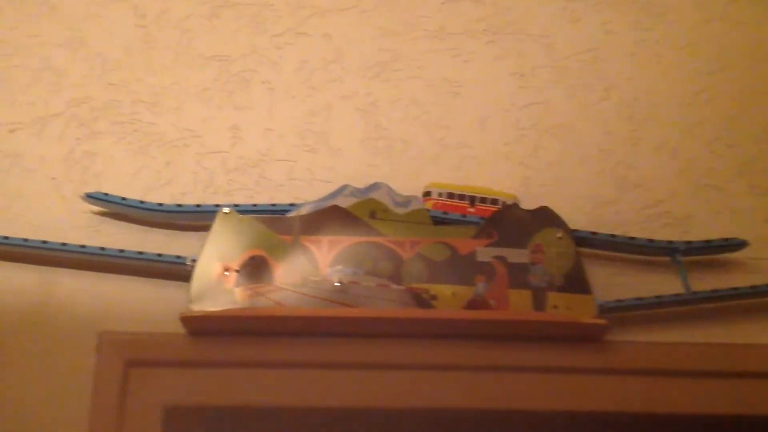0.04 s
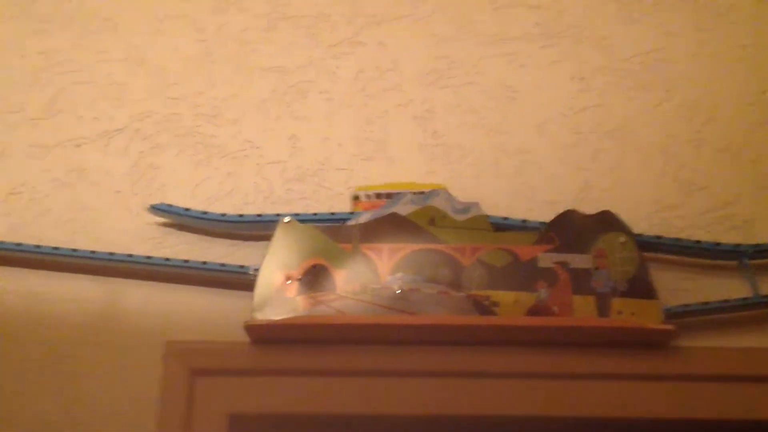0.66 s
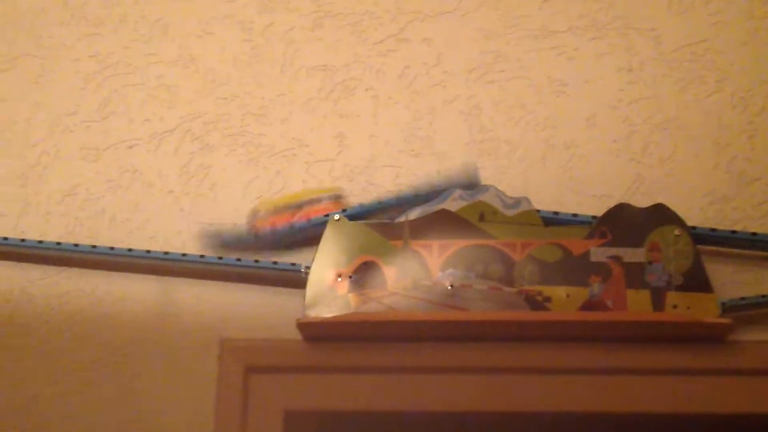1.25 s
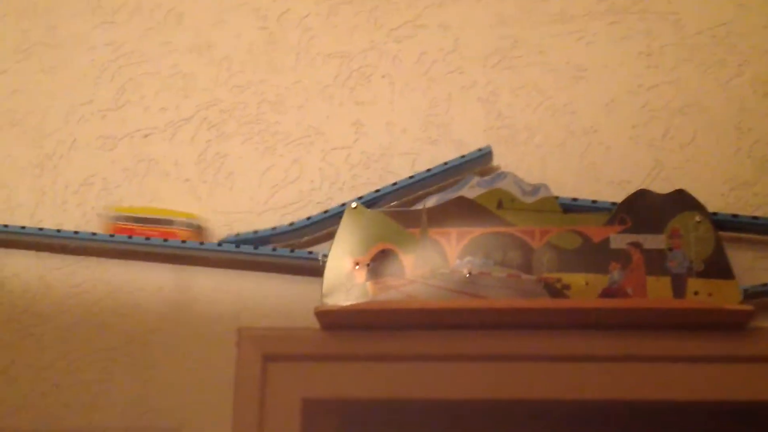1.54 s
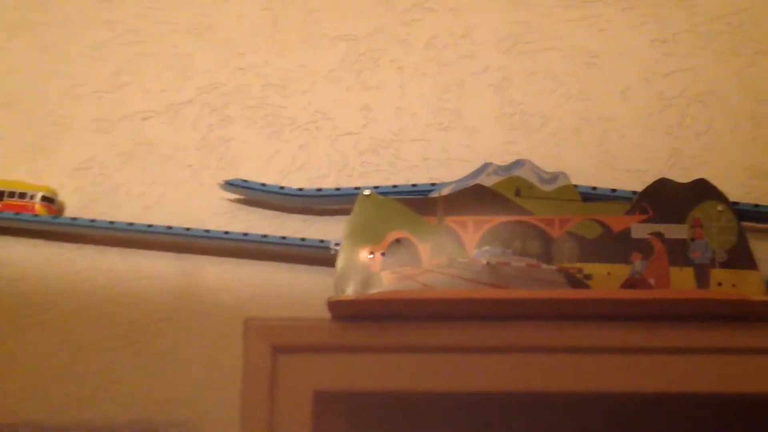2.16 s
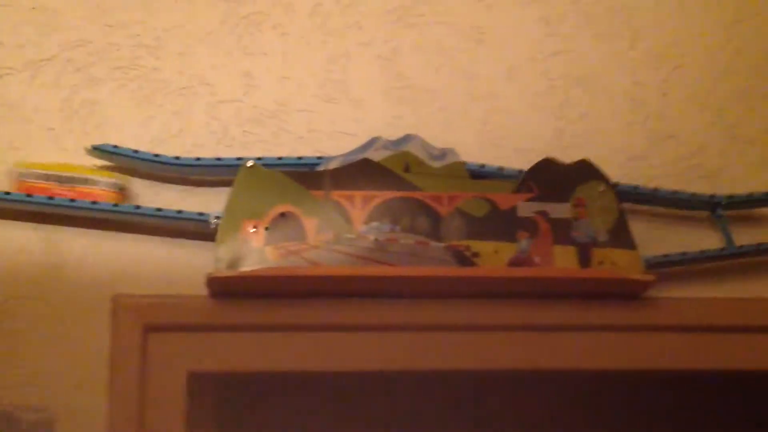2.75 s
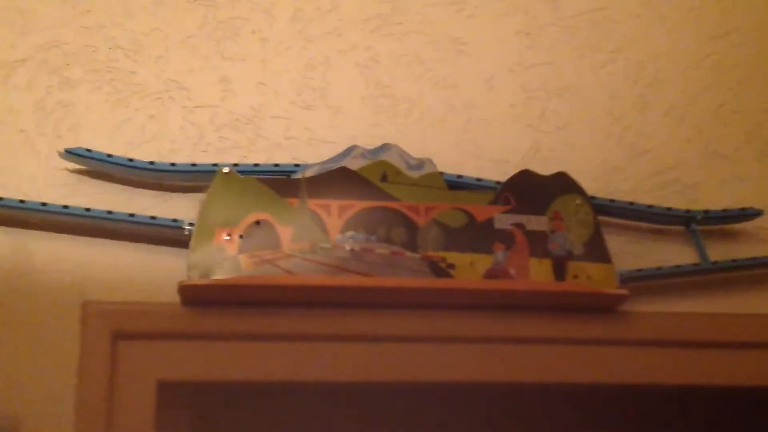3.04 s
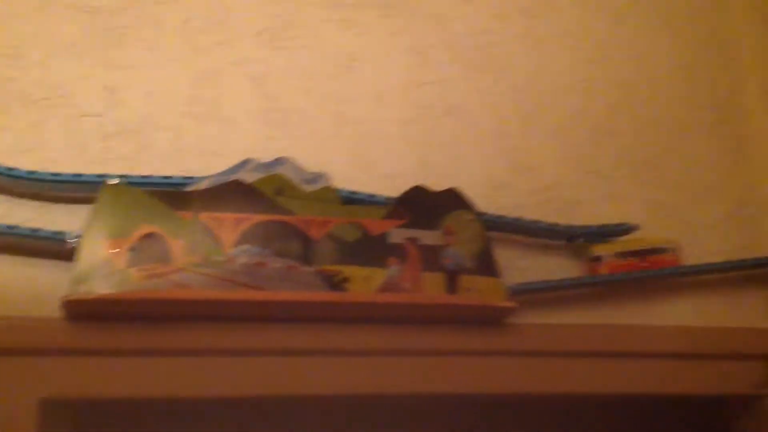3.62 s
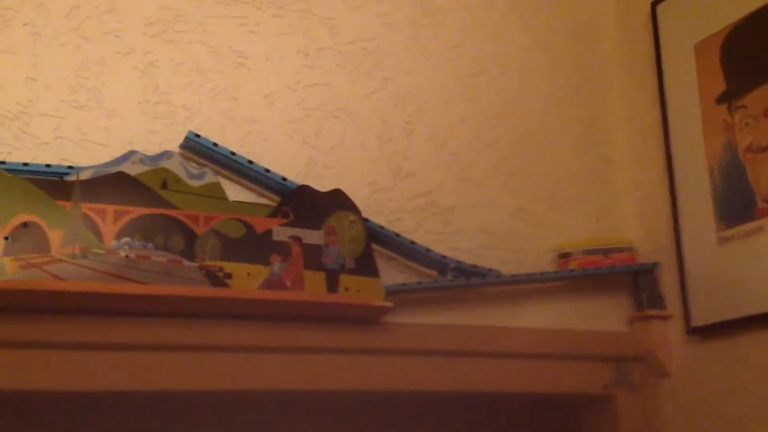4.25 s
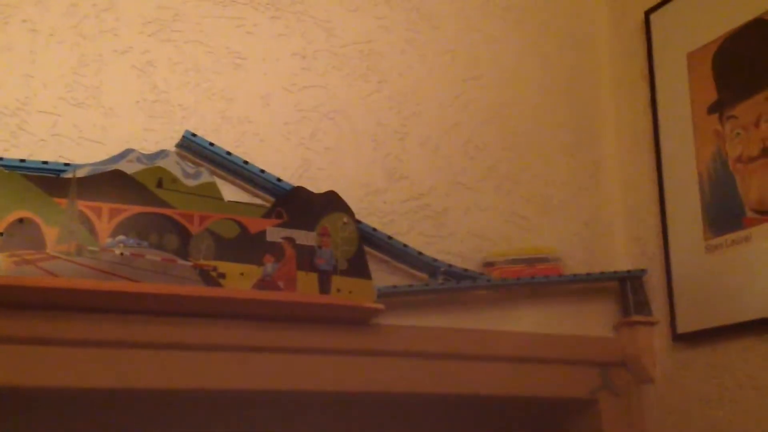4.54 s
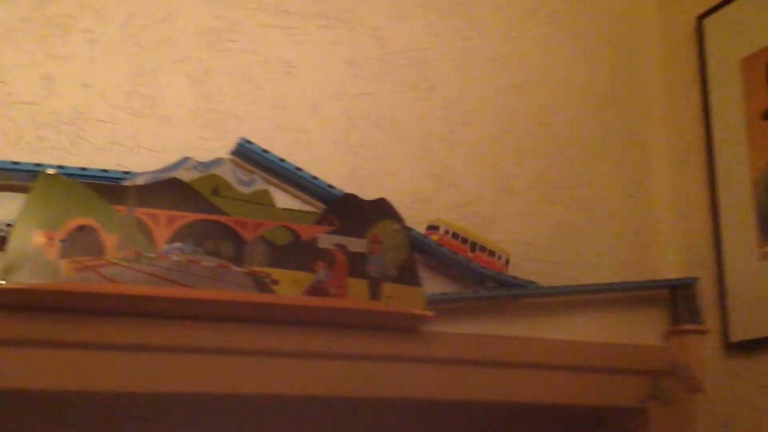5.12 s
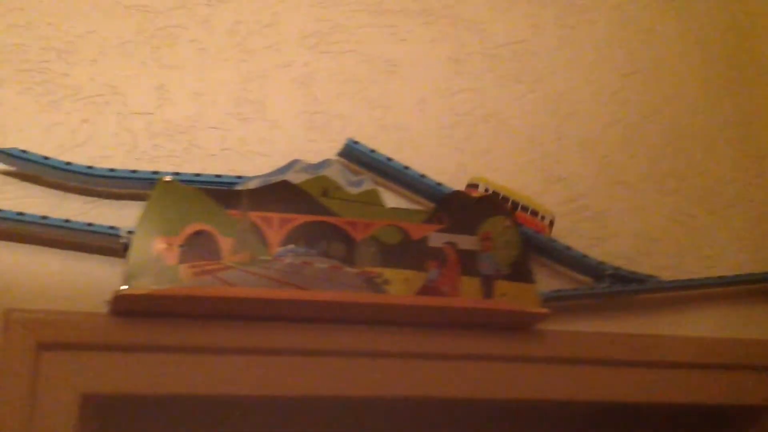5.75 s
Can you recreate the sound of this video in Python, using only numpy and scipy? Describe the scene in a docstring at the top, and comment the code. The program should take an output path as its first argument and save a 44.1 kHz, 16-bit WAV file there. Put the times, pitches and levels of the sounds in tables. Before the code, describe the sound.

In a small room, the thin, buzzing chatter of a wind-up toy bus mixes with wheels rattling on a tin track. A burst of metallic clatter and a knock stop it, with a brief ring from the rail. It rolls off again, growing louder as the gears return, then knocks to a second halt. More clatter follows, and the gears whir on, gradually slowing, dotted with hard tinny clicks. A faint hush lies underneath.

```python
"""First you hear the chattering gears and rumbling wheels of a clockwork tin bus in a small room. It shuttles
along a sheet-metal track, and its wheels shake the tin scenery into a drone. It clatters over two tipping ramps
and bumps the end stops, where it halts and rolls back. A few blows leave the rail ringing. The wheels bump over
rail joints and the pinion now and then skips a tooth with a click. A faint hush lies under it all."""
import sys
import numpy as np
from scipy import signal
from scipy.fft import rfft, irfft, next_fast_len
from scipy.io import wavfile
from scipy.ndimage import map_coordinates

SR = 44100
rng = np.random.default_rng(int(sys.argv[2]) if len(sys.argv) > 2 else 0)


def log_audio(samples):
    """Write samples as a 16-bit WAV file to the path given in sys.argv[1]."""
    # one column per channel
    frames = np.atleast_2d(samples).T
    # limit to full scale, then quantise
    limited = np.clip(frames, -1, 1)
    pcm = np.round(limited * 32767).astype(np.int16)
    wavfile.write(sys.argv[1], SR, pcm)


N = 259749
TIME = np.arange(N) / SR


def amp(db):
    """Turn decibels into a gain."""
    return 10 ** (np.asarray(db) / 20)


def unit(x):
    """Scale to an average power of 1."""
    return x / np.sqrt(np.mean(x ** 2) + 1e-20)


def along(points, hz):
    """Read between (pitch, value) points on a log pitch axis."""
    pitches, values = np.transpose(points)
    return np.interp(np.log(hz + 1), np.log(pitches + 1), values)


def coloured(x, tone, resonances=(), size=16384):
    """Filter a sound with a broad tone curve plus resonances, the pitches an object favours."""
    hz = np.fft.rfftfreq(size, 1 / SR)
    gain = amp(along(tone, hz))
    for centre, width, db in resonances:
        gain *= np.sqrt(1 + (amp(db) ** 2 - 1) / (1 + (2 * (hz - centre) / width) ** 2))
    # make the filter ring after each hit, never before it
    cepstrum = irfft(np.log(unit(gain)))
    cepstrum[1:size // 2] *= 2
    cepstrum[size // 2 + 1:] = 0
    return signal.fftconvolve(x, irfft(np.exp(rfft(cepstrum))))[:N]


def wobble(rate):
    """A smooth curve through `rate` random values a second."""
    return map_coordinates(rng.standard_normal(int(N * rate / SR) + 4), [TIME * rate])


def contacts(rate, spread_db):
    """Tiny random taps of uneven size, about `rate` a second."""
    happens = rng.random(N) < rate / SR
    signs = rng.choice([-1, 1], N)
    return unit(happens * signs * amp(spread_db * np.clip(rng.standard_normal(N), -2, 2)))


def held(start, end, rise_s, fall_s):
    """A gain that rises at start, holds, and dies away after end."""
    onset = 1 - np.exp(-np.maximum(TIME - start, 0) / rise_s)
    return onset * np.exp(-np.maximum(TIME - end, 0) / fall_s)


# the clockwork pulls: (start [s], end [s], level [dB], drift [dB/s], share sent into the track [dB])
PULLS = [(0, 0.673, -11.5, -0.5, -22), (0.684, 0.906, -15.5, -5, -9), (2.92, 3.7, -19, 1, -4.5),
         (4.726, 5.194, -13.5, -3, -14), (5.206, 5.95, -18.5, -3, -10)]
# the load eases for a moment: (middle [s], length [s], level change [dB])
SLACKS = [(3.195, .18, -10.5), (5.302, 0.11, -4), (5.636, 0.091, -3.5)]
def gear_load():
    """The gears take up the load and let go: how strongly they shake the shell and the track."""
    ease_db = sum(db * np.exp(-(2 * (TIME - s) / length) ** 4) for s, length, db in SLACKS)
    shell, track = np.zeros((2, N))
    for start, end, db, drift, track_db in PULLS:
        drift_db = drift * np.clip(TIME - start, 0, end - start)
        pull = held(start, end, rise_s=0.0027, fall_s=0.0087) * amp(db + ease_db + drift_db)
        shell += pull
        track += pull * amp(track_db)
    return shell, track


# how fast the clockwork shaft spins: (time [s], speed [turns/s])
SHAFT = [(0, 47.5), (.5, 45.7), (.85, 45.6), (2.9, 33), (3.5, 62), (4.75, 58.4), (4.95, 40), (5.15, 34.8),
         (5.4, 30.7), (5.89, 26.5)]
# tone of the gears, and of the rattling track: (pitch [Hz], level [dB])
GEAR_TONE = [(60, -35), (200, -54), (700, -16.5), (2000, -14.5), (3800, -8), (4700, -0.5), (5700, -3),
             (10000, -1), (14000, 0.5), (15300, 1.5)]
RATTLE_TONE = [(40, -63), (110, -32), (200, -14), (500, -15), (1500, -8), (2800, -2), (4000, -4.5),
               (6500, 1.5), (10000, 0.5), (15000, 0)]
# resonances of the bus's tin shell: (pitch [Hz], width [Hz], boost [dB])
SHELL = [(7101, 40, 5), (7306, 45, 5), (7549, 35, 7), (7856, 30, 4), (8517, 30, 4), (9790, 40, 2.5),
         (12048, 45, 3), (12823, 45, 3), (13674, 30, 4), (13960, 40, 5.5)]
def clockwork(teeth=8, loose_db=2, once_a_turn_db=3.5, tooth_spread_db=2.3, uneven_db=0.38):
    """Gear teeth click against the tin shell; an off-centre wheel presses harder once a turn."""
    turns = np.cumsum(np.interp(TIME, *np.transpose(SHAFT))) / SR
    gear_play = .22 * wobble(250)
    new_tooth = np.diff(np.floor(teeth * turns + gear_play), prepend=0) > 0
    clicks = unit(new_tooth * amp(tooth_spread_db * np.clip(rng.standard_normal(N), -2, 2)))
    loose_parts = amp(loose_db) * contacts(rate=5000, spread_db=4.5)
    # the pressure jumps as the wheel catches and eases over the rest of the turn
    pressure = amp(once_a_turn_db * (1 - 2 * (turns % 1)) + uneven_db * wobble(30))
    chatter = amp(1.06) * unit(pressure * (clicks + loose_parts))
    in_shell, in_track = gear_load()
    return coloured(in_shell * chatter, GEAR_TONE, SHELL) + struck_track(in_track * chatter, RATTLE_TONE)


# resonances of the track's two halves: (pitch [Hz], width [Hz], boost [dB])
LEFT = [(181, 25, 6.5), (308, 22, 12.3), (594, 110, 3.8), (714, 120, 5.4), (1100, 45, 6), (1410, 95, 7.3),
        (1620, 29, 3.8), (1783, 44, 4), (2520, 61, 1.5), (2706, 410, 4.5), (6560, 170, 3.2)]
RIGHT = [(314, 21, 10.3), (420, 35, 7.7), (770, 43, 1.7), (1070, 44, 2.3), (1459, 16, 9.3), (1910, 88, 5.5),
         (5100, 82, 9.8)]
def struck_track(force, tone, crossing_s=3.75):
    """Blows sound the left half of the track until the bus crosses to the right half."""
    on_left = TIME < crossing_s
    return coloured(force * on_left, tone, LEFT) + coloured(force * ~on_left, tone, RIGHT)


# resonances of the upper track: (pitch [Hz], width [Hz], boost [dB])
UPPER = [(177, 19, 10), (198, 2.7, 13), (296, 6.7, 8.8), (710, 75, 10), (1020, 20, 7), (1430, 77, 5),
         (1760, 14, 8.5), (4900, 400, 4.5)]
# the wheels rub harder: (start [s], end [s], extra rail noise [dB], extra drone [dB])
RUBS = [(0.652, 0.904, 9, 6.5), (2.96, 3.095, 1.5, 11), (3.1, 3.269, -2, 9), (3.272, 3.368, -1.5, 13.5),
        (3.373, 3.46, -2, 9), (3.62, 3.707, 5.5, 2.5), (4.72, 4.805, 3.5, 4), (5.366, 5.59, 3, 1)]
# runs of the bus: (start [s], end [s], first speed [0-1], last speed [0-1], extra drone [dB], section)
RUNS = [(0, 0.937, 0.31, 0.36, 1, "upper"), (0.96, 1.327, 0.34, 0.22, -2.5, "upper"),
        (1.347, 1.923, 0.71, 0.15, -2, "left"), (2.24, 3.472, 0.059, 1, -2, "left"),
        (3.482, 3.948, 0.69, 0.22, 2, "left"), (4.21, 4.625, 0.0015, 0.42, 0.5, "right"),
        (4.615, 5.95, 0.22, 0.31, 2, "right")]
def rolling(rail_db=-16.5, drone_db=-25.5, rail_power=1.093, drone_power=0.85):
    """On each run the speed changes evenly; faster wheels make the rails and the scenery louder."""
    sections = {"upper": UPPER, "left": LEFT, "right": RIGHT}
    scrape_db, shake_db = sum(np.outer(extras_db, held(start, end, rise_s=0.0071, fall_s=0.0071))
                              for start, end, *extras_db in RUBS)
    for start, end, first, last, extra_db, section in RUNS:
        speed = np.interp(TIME, [start, end], [first, last])
        moving = held(start, end, rise_s=0.004, fall_s=0.004)
        rail_gain = moving * speed ** rail_power * amp(rail_db + scrape_db)
        drone_gain = moving * speed ** drone_power * amp(drone_db + extra_db + shake_db)
        yield speed, rail_gain, drone_gain, sections[section]


# tone of the wheels, and of shaken sheet metal: (pitch [Hz], level [dB])
WHEEL_TONE = [(40, -57), (110, -36), (190, -24), (450, -17), (800, -10), (1500, 1.5), (2800, -2),
              (4000, -2), (6500, -4.5), (10000, -5.5), (15000, -7)]
SHEET_TONE = [(40, -64), (110, -49), (190, -32), (450, -16.5), (650, -1.5), (1100, -0.5), (1450, -10.5),
              (2200, -12), (3500, -16.5), (6000, -28)]
# resonances of the tin scenery: (pitch [Hz], width [Hz], boost [dB])
SCENERY = [(202, 5.3, 19.5), (311.8, 5, 17), (670, 19, 2.5), (794, 65, 5.8), (1046, 120, 6), (1260, 29, 3),
           (3240, 460, 8.5)]
def wheels(soft_hz=2000, hard_speed=0.24):
    """Rough wheels patter on the rails, duller when slow, and the scenery on the track drones along."""
    bumps_db = wobble(45)
    patter = amp(bumps_db) * contacts(rate=1500, spread_db=3)
    soft = signal.lfilter(*signal.butter(1, soft_hz, fs=SR), patter)
    rails, shaking = np.zeros((2, N))
    for speed, rail_gain, drone_gain, resonances in rolling():
        hardness = 1 - np.exp(-(speed / hard_speed) ** 2)
        rails += coloured(rail_gain * (soft + hardness * (patter - soft)), WHEEL_TONE, resonances)
        shaking += drone_gain
    shaking *= amp(bumps_db + wobble(21.956))
    drone = coloured(shaking * contacts(rate=600, spread_db=4.5), SHEET_TONE, SCENERY)
    return rails + drone


# tone of the background: (pitch [Hz], level [dB])
HUSH_TONE = [(30, -24.5), (100, -12), (200, 6.5), (700, -5.5), (2000, -19), (15000, -13.5)]
def hush():
    """A faint, low, steady noise."""
    return amp(-59.5) * coloured(rng.standard_normal(N), HUSH_TONE)


# The bus strikes ramps and end stops. A fade is the time a sound takes to drop by 60 dB.
# (time [s], level [dB], thud over snap [dB], rattle over snap [dB], rattle fade [s])
KNOCKS = [(1.3295, 0.5, -11.5, -11, 0.1), (1.369, -8.5, -16, -10, 0.53), (1.4186, 0, -14, -19.5, 0.13),
          (1.4364, -3.5, -31, -18, 0.16), (1.533, -5, -20, -22, .17), (1.924, -6.5, -12, -12.5, .24),
          (2.1337, -23, -5, -4.5, 0.21), (2.1674, -20.5, -24, -7.5, 0.095), (2.926, -10, -34, -4, 0.39),
          (3.9703, -13, -4.5, -13, .17), (3.988, -11, -13.5, -17, 0.093), (4.604, -4.5, -7, -12.5, 0.28),
          (4.6442, -7, -16, -22, 0.43), (4.7249, -5.5, -9.5, -19, 0.2)]
# the wheels bump over rail joints: (time [s], level [dB])
JOINTS = [(2.2507, -31), (2.3346, -33), (2.4505, -35.5), (4.327, -33.5), (4.434, -29.5), (4.5488, -18.5)]
# shared by all those bumps: (thud over snap [dB], rattle over snap [dB], rattle fade [s])
JOINT_BLOW = (-2.5, -5.5, 0.11)
# tone of a blow on the shell: (pitch [Hz], level [dB])
SNAP_TONE = [(100, -65), (700, -13), (2000, -13), (4000, -4.5), (7000, -3), (10000, -2), (14500, 3)]
def knocks(rise_s=0.0046, snap_fade_s=0.039, thud_fade_s=0.051, settle_power=1.32):
    """Each blow snaps in the shell, thuds in the track and sets its loose joints rattling."""
    blows = KNOCKS + [(s, db, *JOINT_BLOW) for s, db in JOINTS]
    snap, thud, rattle = np.zeros((3, N))
    for s, db, thud_db, rattle_db, rattle_fade_s in blows:
        start = round((s - rise_s / 2) * SR)
        t = TIME[:min(SR // 2, N - start)]
        span = slice(start, start + len(t))
        blow = amp(db) * (1 - np.exp(-(t / rise_s) ** 2))  # the springy tin gives way at first
        snap[span] += blow * amp(-60 * t / snap_fade_s)
        thud[span] += blow * amp(thud_db - 60 * t / thud_fade_s)
        # loose parts bounce for a while, then come to rest quickly
        rattle[span] += blow * amp(rattle_db - 60 * (t / rattle_fade_s) ** settle_power)
    # snap and thud each get a boost on top of the table levels
    shell = coloured(amp(4.5) * snap * contacts(rate=11000, spread_db=5), SNAP_TONE, SHELL)
    track = struck_track(amp(4) * thud * contacts(rate=3000, spread_db=3.5), SHEET_TONE)
    joints = struck_track(rattle * contacts(rate=3300, spread_db=1.5), RATTLE_TONE)
    return shell + track + joints


# blows that leave the rail ringing: (time [s], level [dB], brightness [dB/octave])
RINGS = [(1.331, -26.5, 6), (1.926, -30.5, 4), (2.135, -41, 9)]
# the rail's own notes: (pitch [Hz], level [dB], fade [s])
RAIL_NOTES = [(592, 0.5, 0.65), (1724, -2, 0.85), (2410, -4, 0.37), (2670, -9, 0.23), (2800, -3, 0.36),
              (3130, -7, 0.24), (3060, -12.5, .22), (6100, -11, .2)]
def rail_ring(rise_s=0.0024, pivot_hz=1724):
    """After a blow the rail rings on freely, each note fading at its own pace."""
    ring = np.zeros(N)
    t = TIME[:SR]
    for s, db, brightness in RINGS:
        for hz, note_db, fade_s in RAIL_NOTES:
            strength_db = db + note_db + brightness * np.log2(hz / pivot_hz) + rng.normal(0, 1)
            swing = (1 - np.exp(-t / rise_s)) * np.sin(2 * np.pi * hz * t)
            ring[round(s * SR):][:SR] += amp(strength_db - 60 * t / fade_s) * swing
    return ring


# the pinion skips a tooth: (time [s], level [dB])
CLICKS = [(2.6334, -18), (3.8016, -1), (3.861, -11.5), (4.8547, -10), (5.004, -4.5), (5.165, -3),
          (5.3113, -12), (5.528, -10)]
# their tone: (pitch [Hz], level [dB])
CLICK_TONE = [(100, -63), (700, -26), (2000, -19), (4500, -9.5), (7000, -3), (10000, -1), (14500, 5.5)]
def skipped_teeth(rise_s=0.00076, fade_s=0.028):
    """The clockwork pinion skips a tooth: thin, hard clicks ring in the shell without stirring the track."""
    force = sum(amp(db) * held(s, s, rise_s, fade_s / np.log(1000)) for s, db in CLICKS)
    return coloured(amp(4.5) * force * contacts(rate=12000, spread_db=3.5), CLICK_TONE, SHELL)


# how long the room echoes: (pitch [Hz], fade [s])
ROOM_FADES = [(150, 0.46), (400, 0.48), (1000, 0.3), (4000, 0.25), (8000, 0.15), (14000, 0.13)]
def room(x, direct_db=-7, early_db=-2, early_fade_s=0.018, hop=2048):
    """The tin sheets and the near wall smear each click, then the room echoes."""
    out = np.zeros(N + 2 * SR)
    padded = np.pad(x, (hop, 2 * hop))
    window = np.sin(np.pi * np.arange(2 * hop) / (2 * hop))
    # echoes change as the bus moves, so each short slice gets a new random one
    for start in range(0, N + hop, hop):
        hz, t, noise = signal.stft(rng.standard_normal(SR // 2), SR, nperseg=256)
        decay = amp(-60 * t / along(ROOM_FADES, hz)[:, None])
        tail = signal.istft(noise * decay, SR, nperseg=256)[1]
        early = rng.standard_normal(len(tail)) * amp(-60 * TIME[:len(tail)] / early_fade_s)
        echo = tail / np.linalg.norm(tail) + amp(early_db) * early / np.linalg.norm(early)
        echo[0] += amp(direct_db)
        heard = signal.fftconvolve(padded[start:start + 2 * hop] * window, echo / np.linalg.norm(echo))
        out[start:start + len(heard)] += heard
    return out[hop:hop + N]


def scene():
    """The toy in the room, with the ringing rail and the hush, in mono."""
    background = hush()
    toy = clockwork() + wheels() + knocks() + skipped_teeth()
    return (room(toy) + rail_ring() + background)[None]


def record(dry, top_hz=15330, ceiling=.88):
    """The microphone clips the loudest peaks and passes nothing above top_hz."""
    size = next_fast_len(N + SR // 2)
    hz = np.fft.rfftfreq(size, 1 / SR)
    cut_highs = lambda x: irfft(rfft(x, size) * (hz < top_hz), size)[..., :N]
    return cut_highs(np.clip(cut_highs(dry), -ceiling, ceiling))


dry = scene()
out = record(dry)
log_audio(out)
```